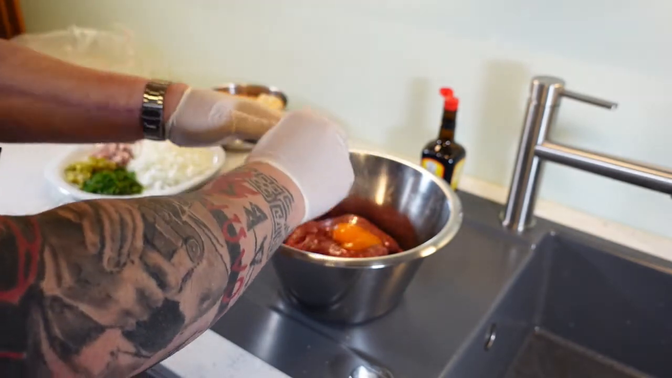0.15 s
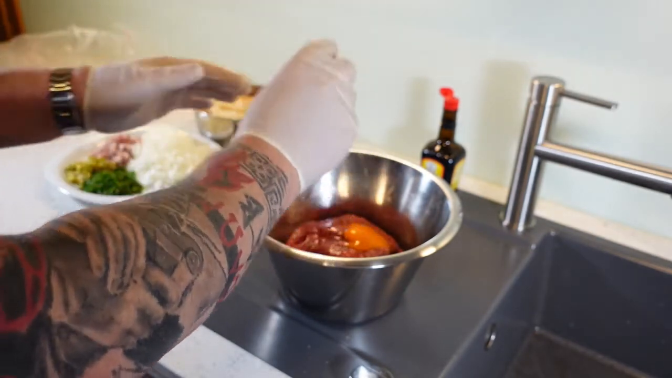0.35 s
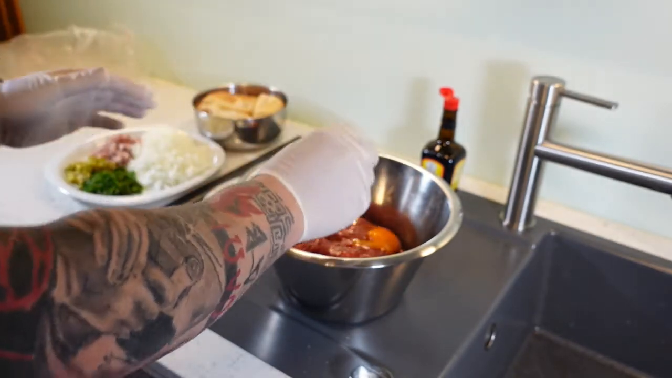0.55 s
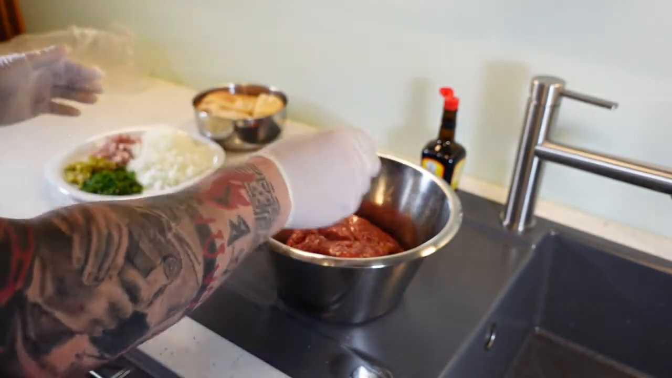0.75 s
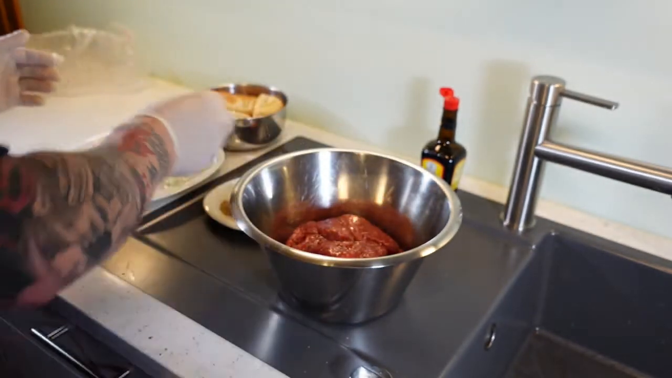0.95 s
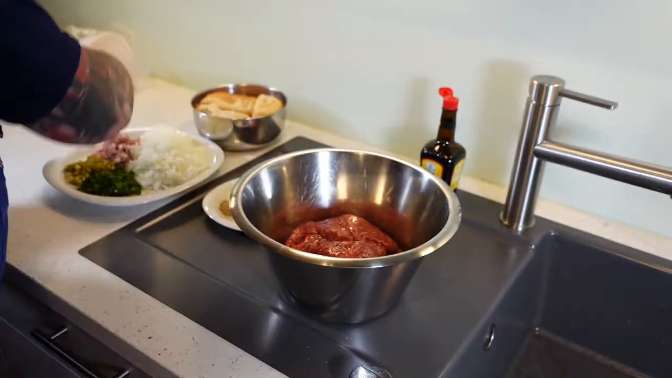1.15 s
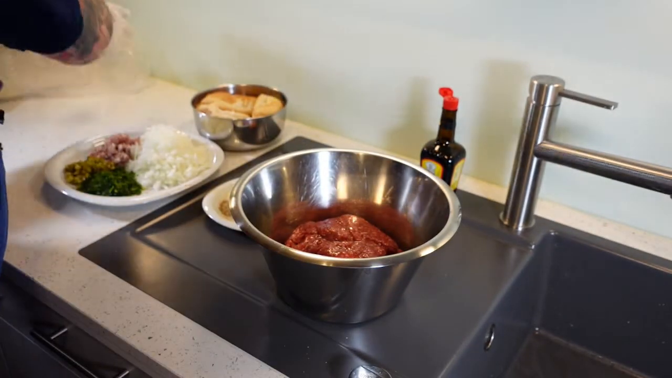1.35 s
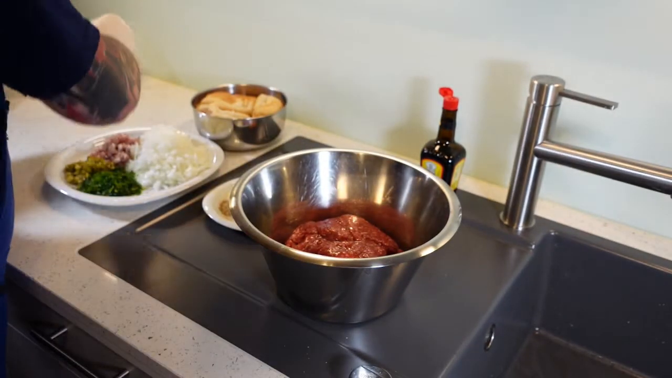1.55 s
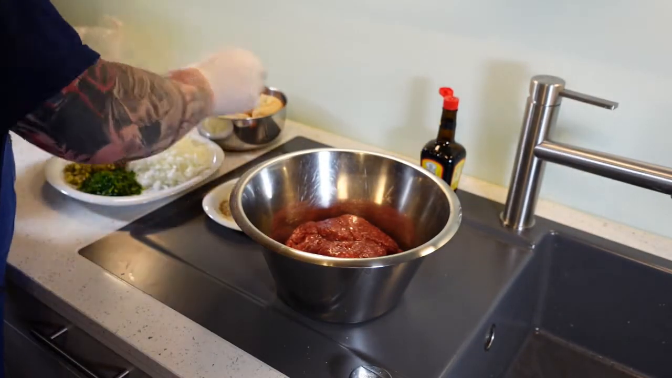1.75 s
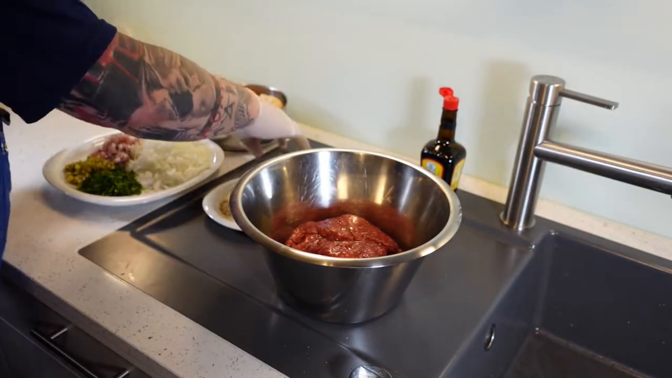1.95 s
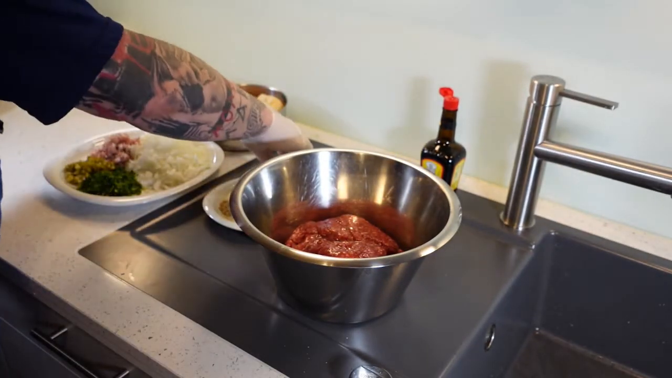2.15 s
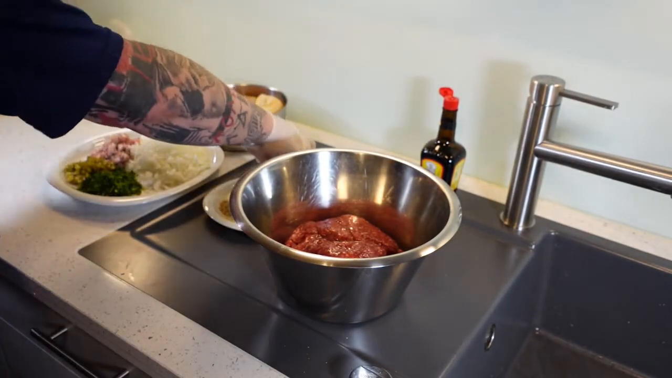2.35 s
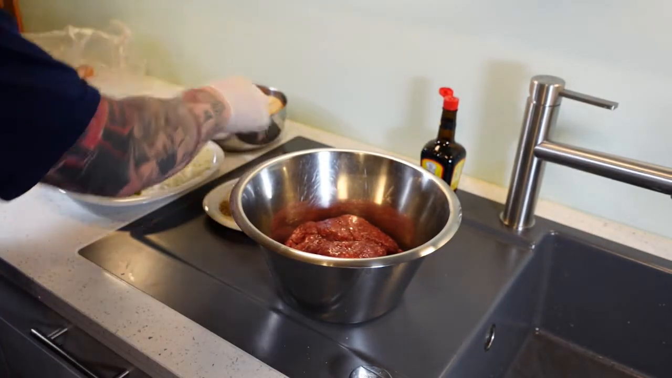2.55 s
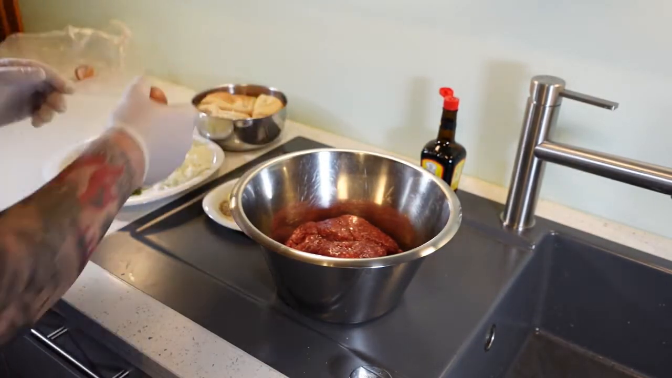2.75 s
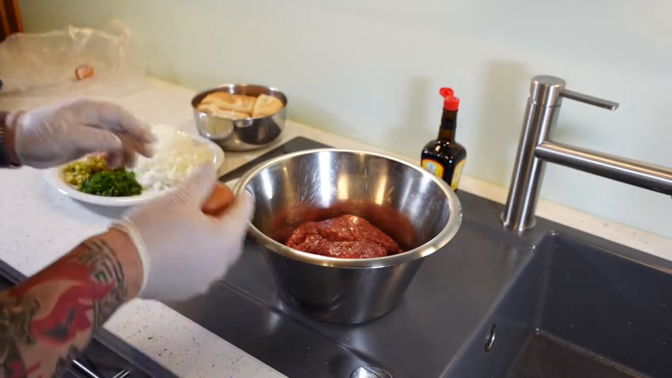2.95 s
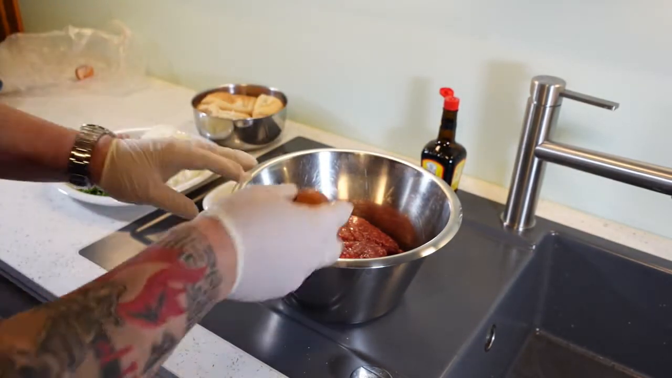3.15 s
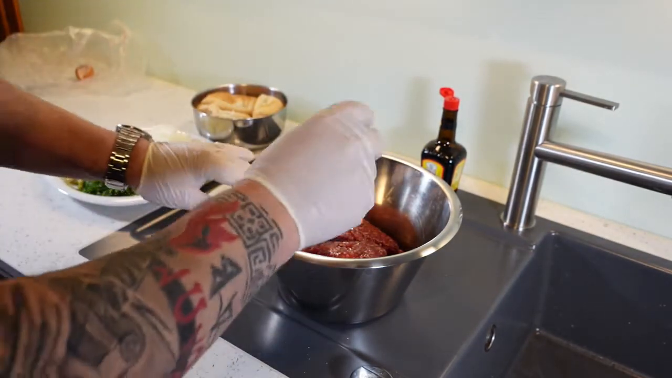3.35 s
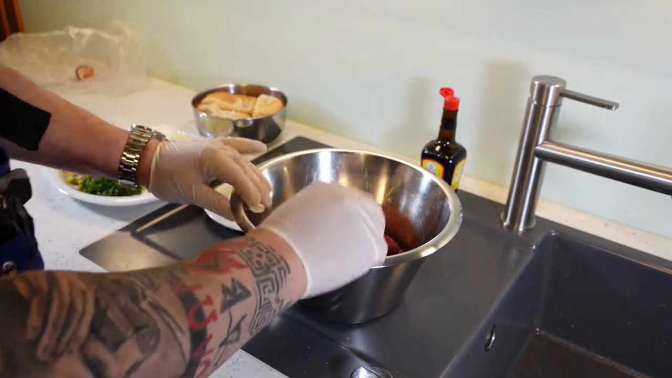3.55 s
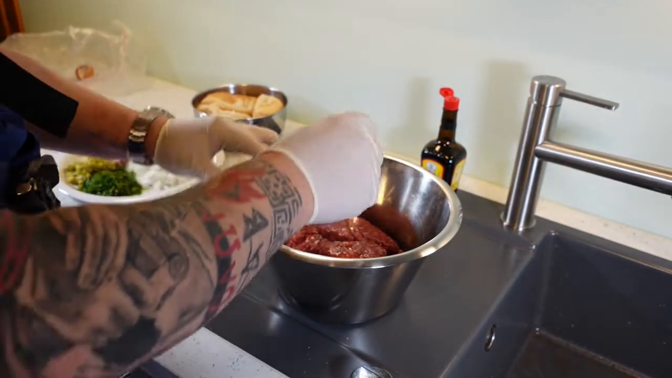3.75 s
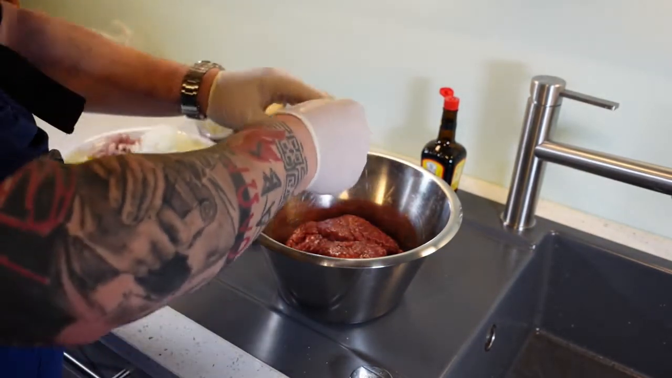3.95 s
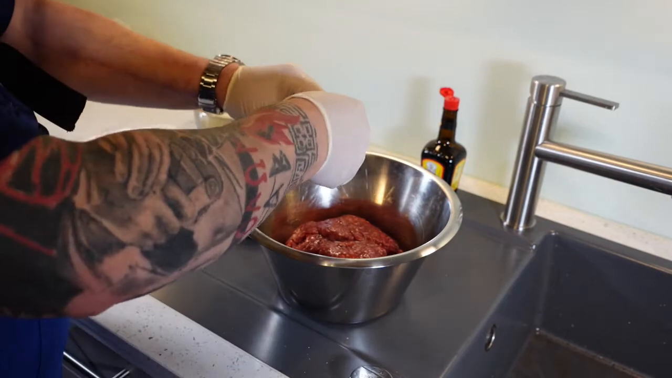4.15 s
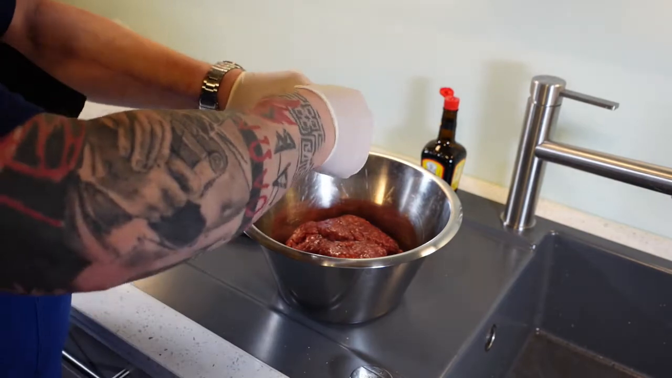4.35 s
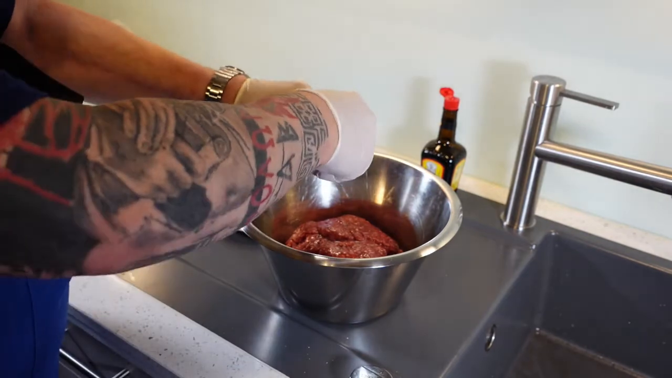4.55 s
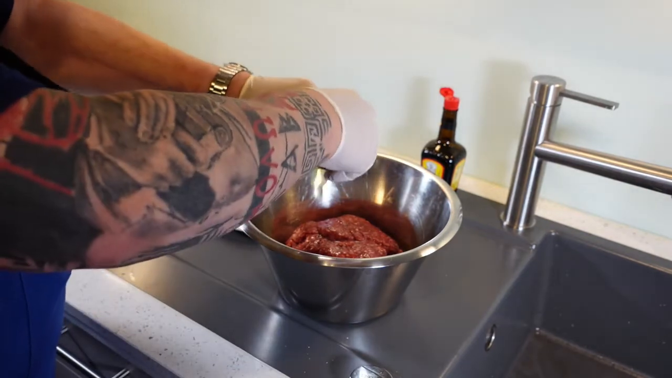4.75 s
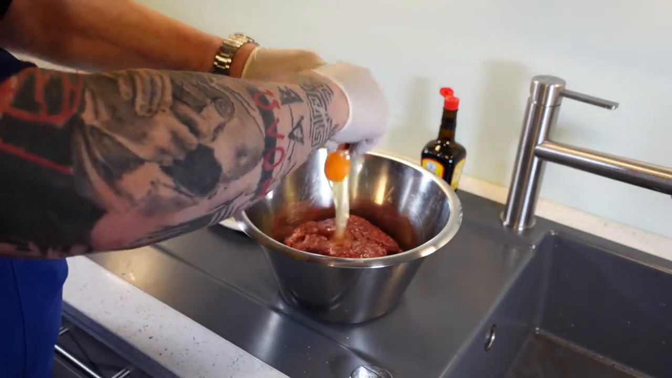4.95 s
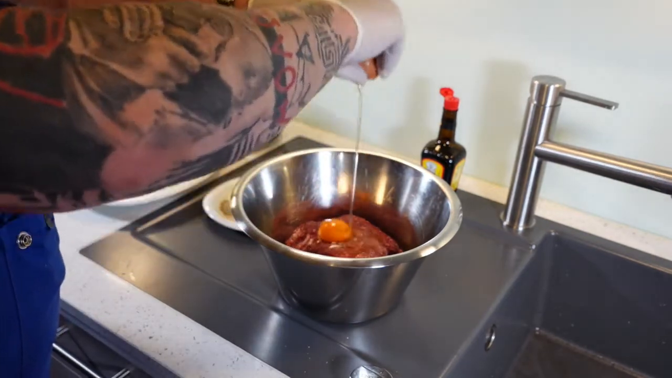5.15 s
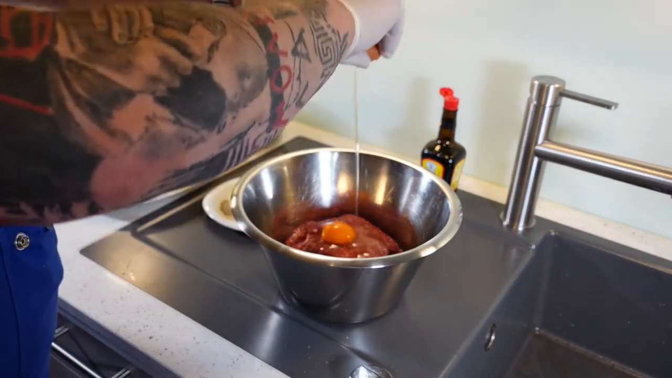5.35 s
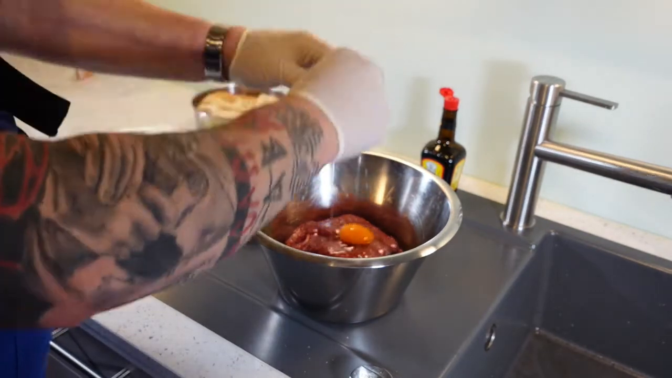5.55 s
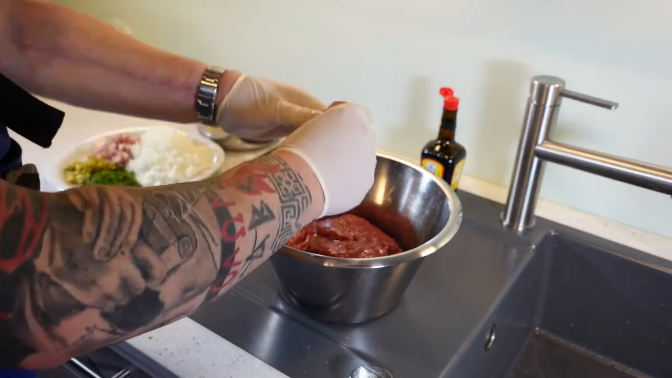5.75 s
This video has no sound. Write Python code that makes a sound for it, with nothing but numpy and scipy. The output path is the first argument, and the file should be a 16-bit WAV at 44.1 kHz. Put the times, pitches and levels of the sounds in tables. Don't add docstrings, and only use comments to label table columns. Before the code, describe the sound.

Close in a hard-walled kitchen, an eggshell snaps and crumbles in gloved hands. A plastic bag crumples loudly as the shell lands in it. After light ticks, an egg hits the steel bowl's rim, which rings with a slow beat. More shell cracking follows, with a sharp snap as the egg opens. A small nearby microphone also picks up quiet room tone.

```python
import sys
import numpy as np
from scipy import signal
from scipy.fft import rfft, irfft
from scipy.io import wavfile
from scipy.ndimage import uniform_filter1d

SR = 44100
rng = np.random.default_rng(int(sys.argv[2]) if len(sys.argv) > 2 else 0)


def transcribe(signal):
    frames = np.atleast_2d(signal).T
    limited = np.clip(frames, -1, 1)
    pcm = np.round(limited * 32767).astype(np.int16)
    wavfile.write(sys.argv[1], SR, pcm)


def decibels_to_gain(level_db):
    exponent = np.asarray(level_db, float) / 20
    return 10 ** exponent


N = 256220

# frequency in Hz, level in dB.
ROOM_TONE_COLOUR = [(20, -36), (50, -19), (100, -19), (200, -2.5), (400, -6.5), (800, -12), (1500, -11.5),
                    (3000, -14), (6000, -17.5), (12000, -22.5), (15500, -22), (16800, -47)]
# frequency in Hz, likeness from 0 to 1.
STEREO_LIKENESS = [(30, .5), (100, 0.17), (250, 0.66), (600, 0.39), (1650, 0.85), (5000, 0.95),
                   (15000, 0.89)]
# frequency in Hz, t60 in seconds.
KITCHEN_DECAY = [(150, 0.42), (600, 0.47), (2000, 0.44), (6000, 0.43), (14000, 0.31)]
# start in seconds, level in dB, pitch in Hz, t60 in seconds.
BUMPS = [(0.73, -58, 207, 0.55), (1.451, -57.5, 150, 0.23), (2.089, -57.5, 430, 0.31),
         (2.092, -57.5, 820, 0.31), (2.166, -54, 425, 0.22), (2.275, -56.5, 410, 0.46),
         (2.301, -60, 4900, 3), (2.32, -62.5, 2700, 2.4), (3.2038, -38, 186, 0.13),
         (3.24, -45.5, 207, 0.15), (3.53, -37.5, 227, 0.17), (3.72, -57.5, 168, 0.8),
         (4.415, -41, 1170, 0.059), (4.419, -56, 450, .06)]
# frequency in Hz, level in dB per Hz.
GLOVE_COLOUR = [(290, -44), (500, -30), (641, -7), (924, -5), (2260, -0.5), (3500, -1), (6100, 3.5),
                (15300, -7.5), (16500, -23)]
# frequency in Hz, level in dB per Hz.
CRUMBLE_COLOUR = [(600, -68), (1100, -27), (1700, -2.5), (2500, -2), (3500, 3), (6000, -7.5), (16500, -20)]
# frequency in Hz, level in dB per Hz.
FILM_COLOUR = [(120, -52), (200, -17.5), (382, -18), (1050, -14.5), (1320, -12), (2330, -5), (3070, -8.5),
               (5980, -6.5), (14200, -9.5), (15600, -13), (16500, -63)]
# time in seconds, effort in dB, crumbling shell against glove in dB.
HAND_EFFORT = [(0.0, -44, 0.5), (0.12, -59, -3), (0.36, -55.5, 2), (0.58, -69.5, -5), (1.051, -62, 4),
               (1.18, -51, -17), (1.41, -65.5, -12), (2.0, -72, -13), (2.09, -60, -4), (2.539, -65, 2),
               (2.88, -63, -30), (3.19, -54, -5.5), (3.5, -65.5, -5.5), (4.34, -73, -4), (4.43, -58, -7),
               (5.0, -57.5, 1), (5.36, -80, -2), (5.58, -52.5, 5.5)]
# time in seconds, effort in dB.
BAG_EFFORT = [
    (1.424, -44),
    (1.446, -23),
    (1.622, -38.5),
    (1.74, -40.5),
    (1.918, -53.5),
    (1.978, -50),
    (2.1, -58),
]
# frequency in Hz, level in dB per Hz.
BLOW_COLOUR = [(40, -27), (200, -14.5), (600, -15), (950, -15.5), (2000, -15.5), (3300, -7.5), (3800, -14),
               (4400, -10), (5400, -20), (6500, -15), (8000, -22), (9300, -24), (15400, -34.5),
               (16500, -28)]
# frequency in Hz, level in dB, t60 in seconds.
BOWL_MODES = [(1199, -25, .32), (1502, -46, 1.5), (1556.5, -24, .52), (1604, -33, .95), (1668, -50, 1.6),
              (2040, -56, 2.), (2235, -46, 1.1), (2471, -36, .5), (2647, -35, .55), (2726, -35, .5),
              (3135, -43, .95), (3207, -41, .55), (3246, -35, .55), (3303, -27, .55), (3357, -31, .5),
              (3396, -24, .45), (3633, -38, .5), (3929, -34, .4), (4307, -39, .5), (4335, -37, .45),
              (4678, -43, .45), (4807, -43, .55), (6277, -44, .45), (6686, -42, .45), (9300, -50, .45)]
# frequency in Hz, level in dB per Hz.
SNAP_COLOUR = [(500, -57), (1000, -22), (1500, -4.5), (3000, -2.5), (6000, -5), (10000, -4.5),
               (15000, -8.5), (16500, -37)]
# start in seconds, snap level in dB, tick colour in Hz.
DRY_TICKS = [(0.1242, -30, 8400), (0.1397, -21.5, 3600), (0.162, -42, 4700), (0.6413, -51, 4600),
             (0.713, -52.5, 8000), (0.7882, -48.5, 10000), (2.6568, -45.5, 5630), (2.718, -44.5, 4550),
             (2.7531, -48, 8600), (2.7984, -44.5, 7500), (2.8715, -47.5, 8300), (3.095, -39.5, 5100),
             (4.2293, -49.5, 4260), (4.363, -36.5, 6200), (4.531, -49, 4340), (4.5674, -44, 5400),
             (4.577, -38.5, 7050), (4.6869, -24.5, 8700), (4.864, -28, 6200), (5.0042, -14, 5500),
             (5.379, -46, 7900), (5.564, -30.5, 3600), (5.6286, -31.5, 7600), (5.7778, -22, 7900)]
# start in seconds, snap level in dB, ring level in dB, ring in Hz.
SHELL_SPLITS = [(0.0895, -19.5, -13, 2100), (0.0921, -29, -22.5, 2410), (0.0934, -28.5, -32, 2700),
                (0.1102, -30, -42, 2230), (0.358, -49, -38, 2320), (0.8314, -58, -48, 1840),
                (1.025, -54, -44.5, 2920), (1.2198, -36, -36, 2014), (1.448, -15.5, -22, 2200),
                (1.4542, -34, -18, 2170), (1.4659, -41, -19.5, 1580), (4.6008, -34, -29, 2560),
                (4.628, -31, -32, 1890), (4.6669, -25, -34, 1620), (4.683, -25, -18.5, 1790),
                (4.689, -42, -20.5, 1900), (4.7174, -48, -35, 2110), (4.837, -59, -35, 1730),
                (4.9905, -44, -33.5, 1960), (5.0984, -29.5, -27.5, 2210), (5.589, -50, -53, 1770)]
# start in seconds, snap level in dB, length in ms.
SLOW_SCRUNCHES = [(0.18, -27, 8.6), (0.1901, -28.5, 13), (0.4173, -34, 17), (1.4243, -30, 11),
                  (3.206, -41, 18), (4.012, -43, 8.7), (4.3754, -39.5, 23), (4.4059, -35.5, 16),
                  (4.4179, -32, 13), (4.6447, -33.5, 14), (5.008, -28.5, 7.9), (5.451, -48.5, 25),
                  (5.4895, -39, 26), (5.598, -29.5, 9.7), (5.7275, -34, 5.8), (5.7488, -36, 23)]


def evened(x):
    return x / np.sqrt(np.mean(x ** 2) + 1e-20)


def read(points, hz):
    f, value = np.transpose(points)
    return np.interp(np.log(hz + 1), np.log(f + 1), value)


def add(mix, s, sound):
    part = mix[..., round(s * SR):][..., :sound.shape[-1]]
    part += sound[..., :part.shape[-1]]


def colour(points):
    level_db = np.maximum(read(points, abs(np.fft.fftfreq(4096, 1 / SR))), -100)
    spectrum = np.exp(np.conj(signal.hilbert(np.log(decibels_to_gain(level_db)))))
    taps = np.fft.ifft(spectrum).real[:2048]
    return taps / np.linalg.norm(taps)


def ring(hz, db, t60, t):
    return decibels_to_gain(db - 60 * t / t60) * np.sin(2 * np.pi * hz * t)


def room_tone():
    level_db, patch_db = -60, 0.5
    frames, hz = N // 256 + 5, np.fft.rfftfreq(1024, 1 / SR)
    a, b, c, d, patches = rng.standard_normal((frames, 513, 5)).T
    patches = evened(uniform_filter1d(uniform_filter1d(patches, 12, 0), 14, 1))
    same = np.clip(read(STEREO_LIKENESS, hz), -1, 1)[:, None]
    left = a + 1j * b
    right = same * left + np.sqrt(1 - same ** 2) * (c + 1j * d)
    gain = decibels_to_gain(read(ROOM_TONE_COLOUR, hz)[:, None] + patch_db * patches)
    tone = signal.istft(np.array([left, right]) * gain, nperseg=1024, noverlap=768)[1]
    return decibels_to_gain(level_db) * evened(tone[:, :N])


def kitchen(x):
    side_db = -11
    out, t = np.zeros((2, N)), np.arange(N) / SR
    for k in range(3):
        taps = np.zeros((2, SR))
        at = np.arange(100, SR - 10, 10) + rng.integers(0, 10, (2, (SR - 101) // 10))
        np.put_along_axis(taps, at, rng.choice([-1., 1.], at.shape), 1)
        hz, s, z = signal.stft(taps, SR, nperseg=256)
        decay = decibels_to_gain(-60 * s / read(KITCHEN_DECAY, hz)[:, None])
        tail = signal.istft(z * decay, SR, nperseg=256)[1]
        tail = tail / np.linalg.norm(tail[0])
        turn = np.sqrt(2 / 3) * np.cos(np.pi * (3 * t + k / 3))
        out += signal.fftconvolve((x * turn)[None], tail, axes=1)[:, :N]
    mid, side = out
    return mid + decibels_to_gain(side_db) * np.array([side, -side])


def thuds():
    panel_q, push_s, swing_cycles = 6.6, 0.0013, 24
    out, t = np.zeros(N), np.arange(SR // 2) / SR
    for (s, db, hz, t60), noise in zip(BUMPS, rng.standard_normal((len(BUMPS), len(t)))):
        panel = evened(signal.lfilter(*signal.iirpeak(hz, panel_q, SR), noise))
        add(out, s, decibels_to_gain(db - 60 * t / t60) * panel * (1 - np.exp(-t / push_s)))
        swing_t60 = min(0.58 * t60, swing_cycles / hz)
        add(out, s, ring(hz, db + 5, swing_t60, t))
    return out


def crackle(points):
    size = decibels_to_gain(2.2 * np.minimum(rng.exponential(1, N), 4))
    clicks = size * rng.standard_normal(N) * (rng.random(N) < 6000 / SR)
    return evened(signal.oaconvolve(clicks, colour(points))[:N])


def forearm_slide(t):
    start_s, hold_s, peak_db = 3.203, .09, -42
    rise_db_per_s, fall_db_per_s = 42, 130
    past = t - start_s - hold_s
    return (t > start_s) * decibels_to_gain(peak_db + np.minimum(rise_db_per_s * past, -fall_db_per_s * past))


def rustle():
    t = np.arange(N) / SR
    hiss, crumble, film = crackle(GLOVE_COLOUR), crackle(CRUMBLE_COLOUR), crackle(FILM_COLOUR)
    s, effort_db, crumble_db = np.transpose(HAND_EFFORT)
    effort = decibels_to_gain(np.interp(t, s, effort_db)) + forearm_slide(t)
    hands = effort * (hiss + decibels_to_gain(np.interp(t, s, crumble_db)) * crumble)
    bag_db = np.interp(t, *np.transpose(BAG_EFFORT), -150, -150)
    return hands + decibels_to_gain(bag_db) * film


def egg_blow():
    knock_db, crush_db, crush_s = -10.5, -22, .055
    t = np.arange(SR // 2) / SR
    u = t / crush_s
    lumps = decibels_to_gain(2.5 * evened(uniform_filter1d(rng.standard_normal(len(t)), 150)))
    grit = rng.standard_normal(len(t))
    strike = decibels_to_gain(knock_db - 60 * t / .02) * grit
    tap = signal.lfilter(*signal.butter(2, 700, "high", fs=SR), strike)
    crush = decibels_to_gain(crush_db) * lumps * u * np.exp(1 - u ** 1.167) * grit
    return signal.oaconvolve(tap + crush, colour(BLOW_COLOUR))


def bowl_ring(t):
    ring_db, hold_s = 2, .1
    out = np.zeros(len(t))
    swell = 1 - .7 * np.exp(-t / .02)
    for (hz, db, t60), noise in zip(BOWL_MODES, rng.standard_normal((len(BOWL_MODES), len(t)))):
        shaken = 1 + .3 * evened(uniform_filter1d(noise, 900)) * np.exp(-t / .25)
        level = decibels_to_gain(ring_db + db - 60 * np.maximum(t - hold_s, 0) / t60)
        out += level * swell * shaken * np.sin(2 * np.pi * hz * t)
    return out


def bowl_sway(t):
    hz, db, t60 = 1252.6, -24, 2.2
    beats_per_s, twin, build_s = 3.63, .82, 0.16
    pair = ring(hz, db, t60, t) - twin * ring(hz - beats_per_s, db, t60, t)
    return (1 - np.exp(-t / build_s)) * pair


def knock():
    t = np.arange(2 * SR) / SR
    layers = np.zeros((3, N))
    for layer, sound in zip(layers, (egg_blow(), bowl_ring(t), bowl_sway(t))):
        add(layer, 3.4858, sound)
    return layers


def crack(snap_db, shell_db, shell_hz, tick_hz, ms):
    t = np.arange(2048) / SR
    u = t / (.0005 * np.clip(ms, .5, 30))
    shape = np.minimum(u / 0.34, 1) * np.exp(-u)
    burst = shape * rng.standard_normal(len(t))
    even = irfft(np.exp(1j * np.angle(rfft(burst)))) * shape ** .3
    splinters = even * np.linalg.norm(shape) / np.linalg.norm(even)
    tick = signal.lfilter(*signal.iirpeak(tick_hz, 3.0, SR), splinters)
    hollow = np.sin(2 * np.pi * shell_hz * t)
    hollow += 0.49 * np.sin(2.3 * np.pi * shell_hz * t) + 0.39 * np.sin(1.7 * np.pi * shell_hz * t)
    shell = hollow * np.minimum(t / .001, 1) * np.exp(-t / (.001 + .0002 * ms))
    return decibels_to_gain(snap_db) * (splinters + 1.57 * tick) + decibels_to_gain(shell_db + 6.5) * shell


def cracks():
    out, edge = np.zeros(N), colour(SNAP_COLOUR)
    rows = [(s, db, db - 23.5, 2100, hz, 4.5) for s, db, hz in DRY_TICKS]
    rows += [(s, db, ring_db, hz, 4930, 3.44) for s, db, ring_db, hz in SHELL_SPLITS]
    rows += [(s, db, db - 11, 1900, 6950, ms) for s, db, ms in SLOW_SCRUNCHES]
    for s, *settings in rows:
        add(out, s, signal.oaconvolve(crack(*settings), edge))
    return out


def scene():
    tone, low, hands, (blow, bowl, sway), shell = room_tone(), thuds(), rustle(), knock(), cracks()
    sent = decibels_to_gain(-2) * shell + decibels_to_gain(-4) * hands + decibels_to_gain(-1) * blow + decibels_to_gain(-8) * bowl + decibels_to_gain(2) * low
    near = shell + hands + decibels_to_gain(3) * blow + low
    near = near + bowl * decibels_to_gain([[.5], [-.5]]) + sway * decibels_to_gain([[1.2], [-1.2]])
    low_cut = signal.butter(2, 140, "high", fs=SR, output="sos")
    return signal.sosfilt(low_cut, near + kitchen(sent)) + tone


def low_pass(x):
    return signal.sosfilt(signal.butter(12, 16960, fs=SR, output="sos"), x)


def record(dry):
    mix = 0.82 * np.tanh(dry / 0.99)
    return low_pass(mix)


dry = scene()
out = record(dry)
transcribe(out)
```